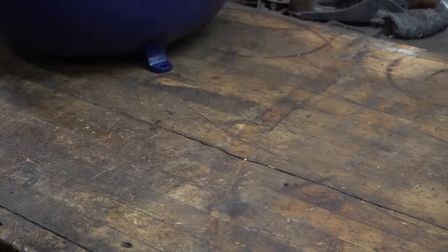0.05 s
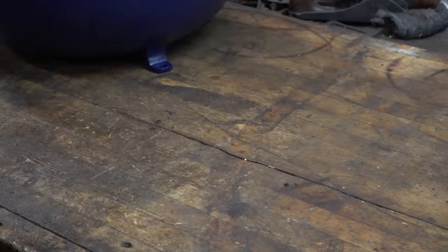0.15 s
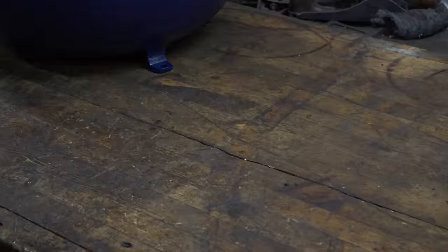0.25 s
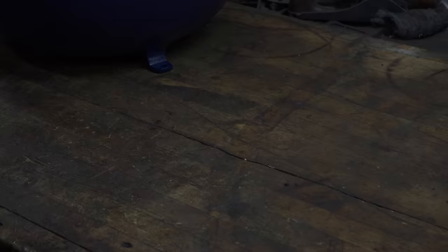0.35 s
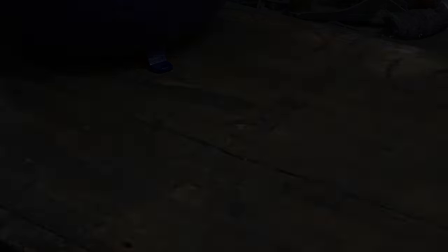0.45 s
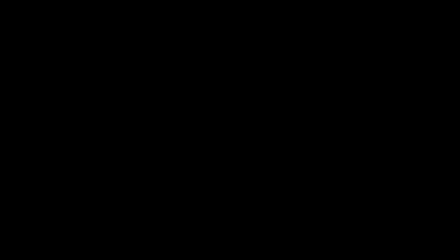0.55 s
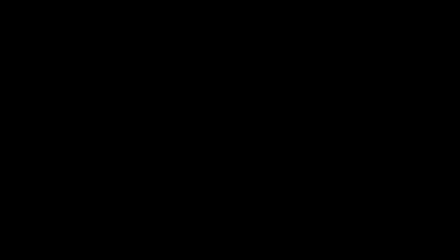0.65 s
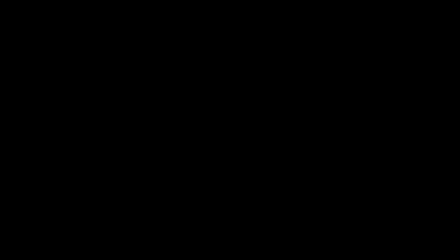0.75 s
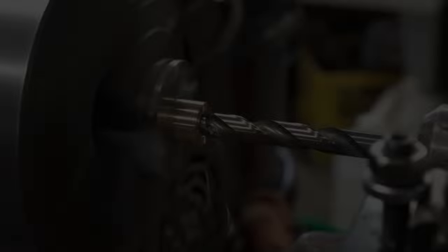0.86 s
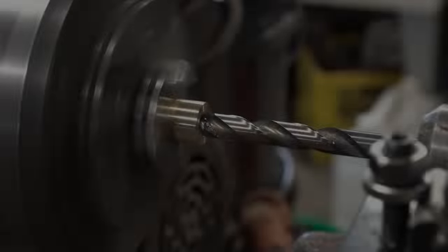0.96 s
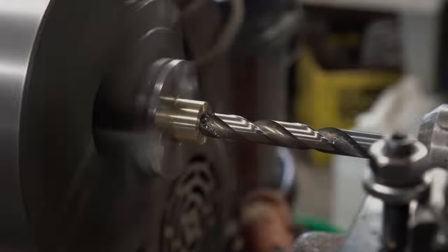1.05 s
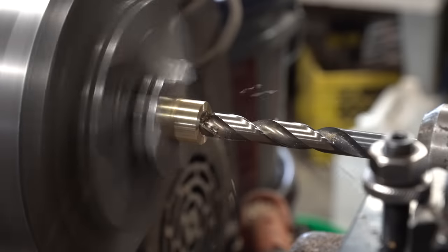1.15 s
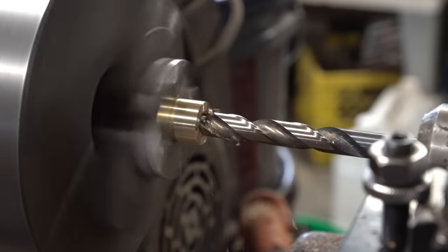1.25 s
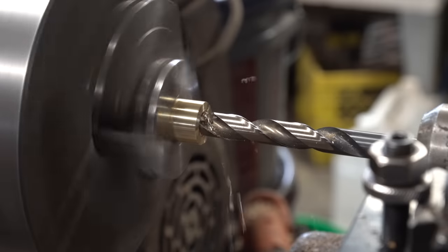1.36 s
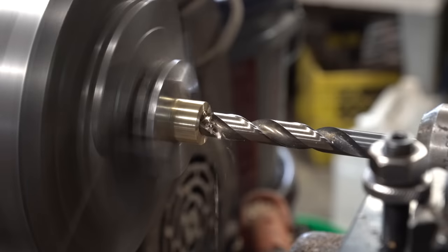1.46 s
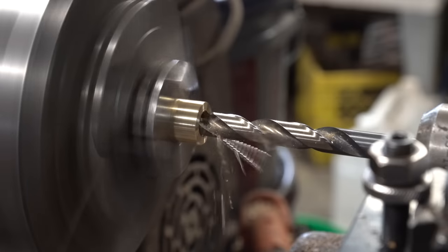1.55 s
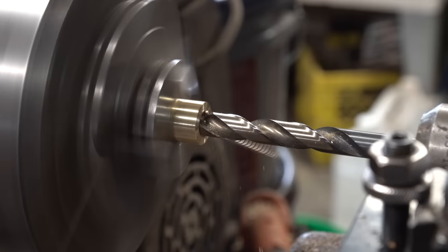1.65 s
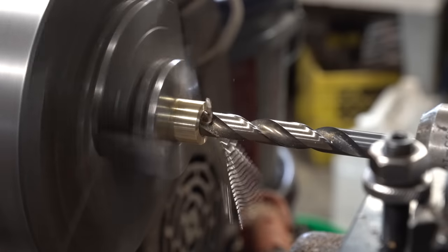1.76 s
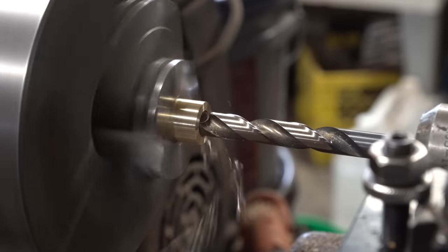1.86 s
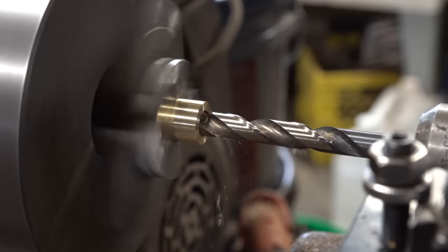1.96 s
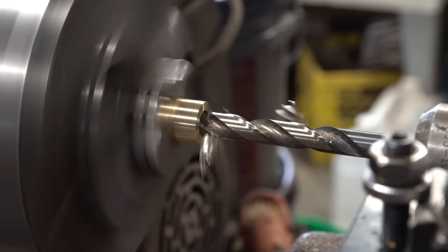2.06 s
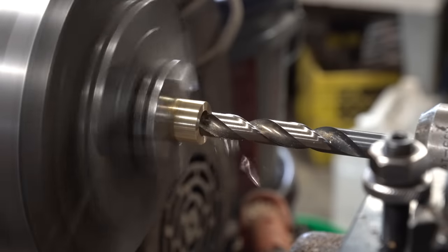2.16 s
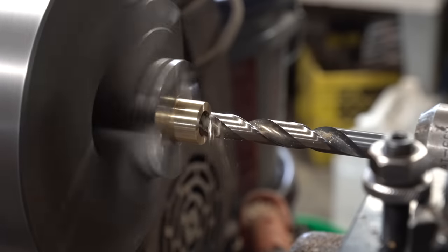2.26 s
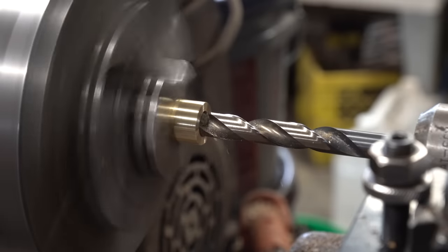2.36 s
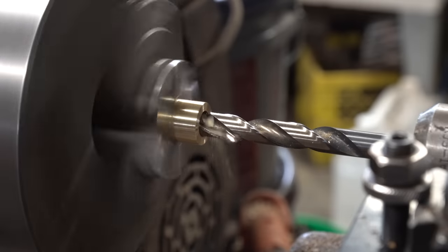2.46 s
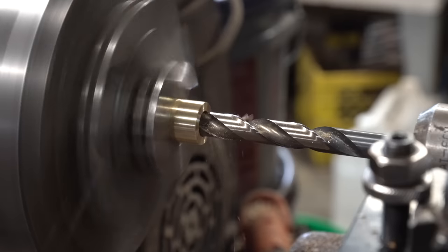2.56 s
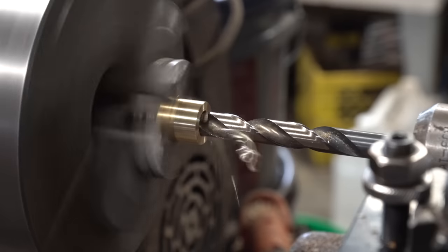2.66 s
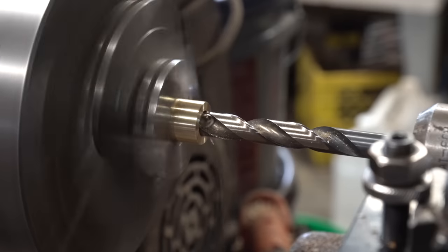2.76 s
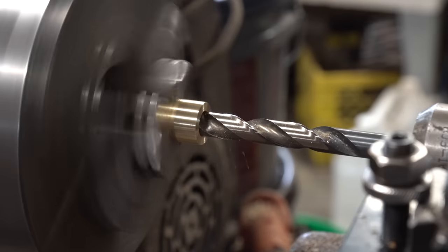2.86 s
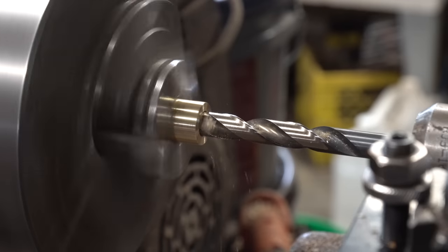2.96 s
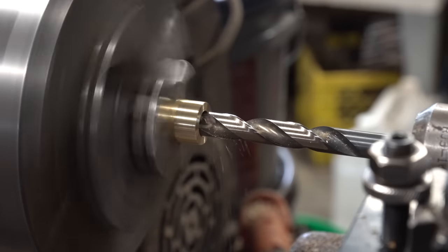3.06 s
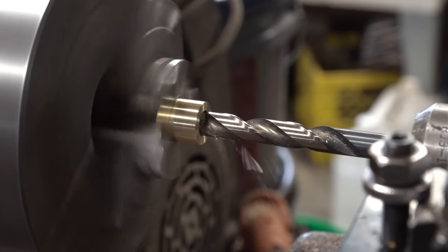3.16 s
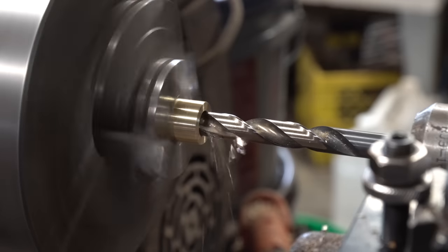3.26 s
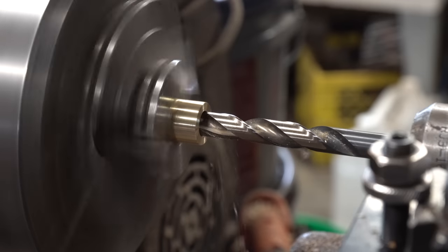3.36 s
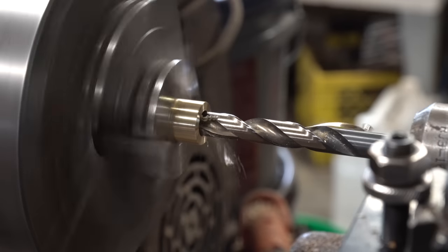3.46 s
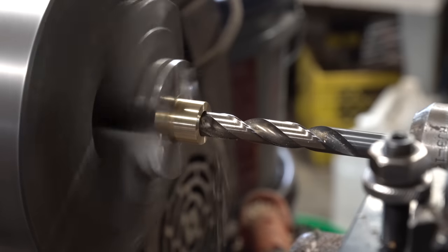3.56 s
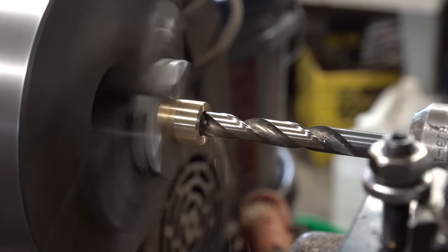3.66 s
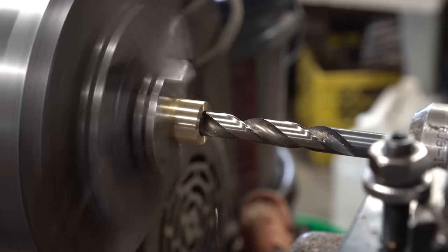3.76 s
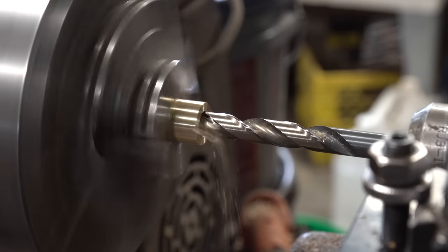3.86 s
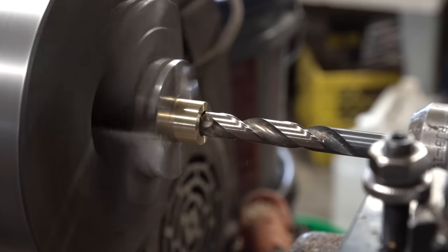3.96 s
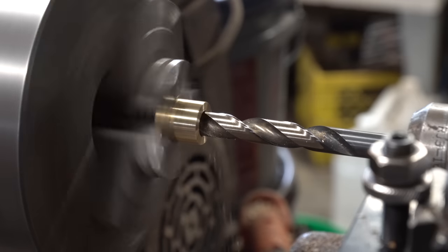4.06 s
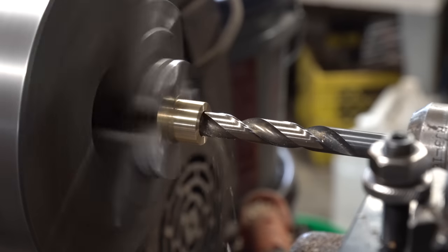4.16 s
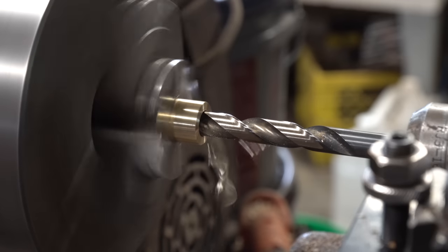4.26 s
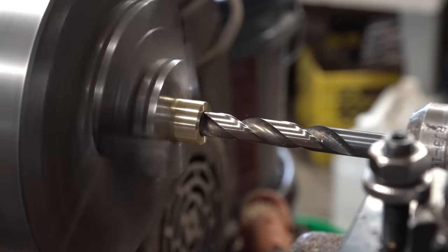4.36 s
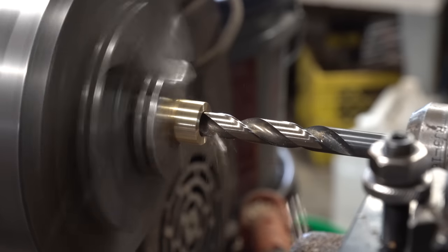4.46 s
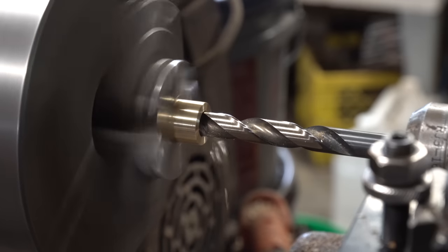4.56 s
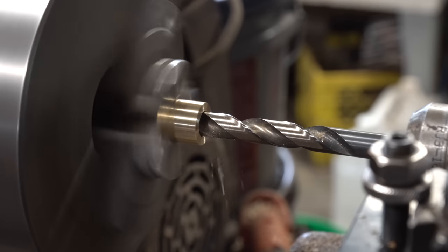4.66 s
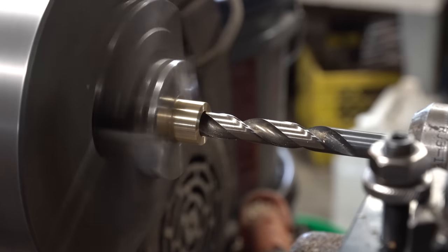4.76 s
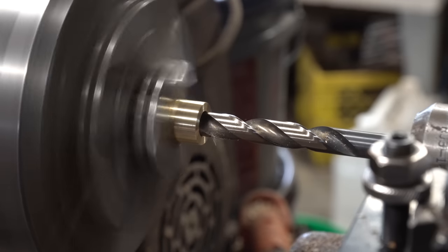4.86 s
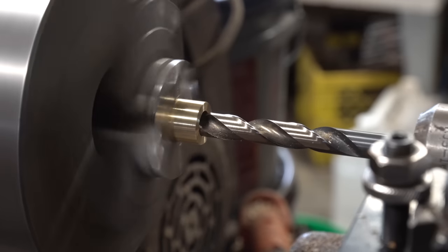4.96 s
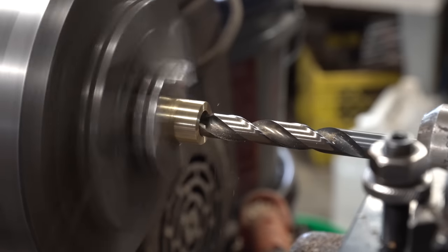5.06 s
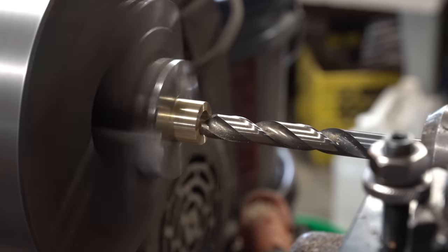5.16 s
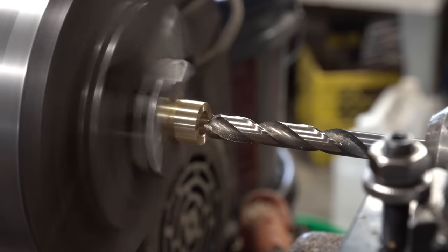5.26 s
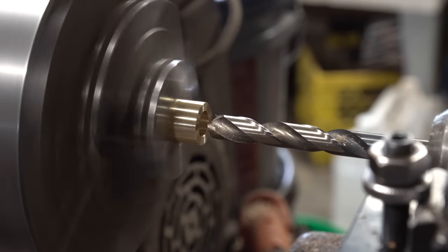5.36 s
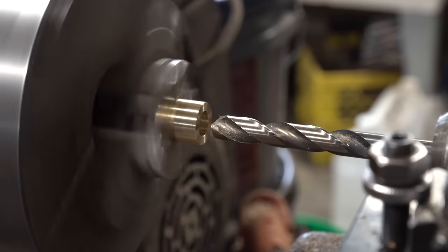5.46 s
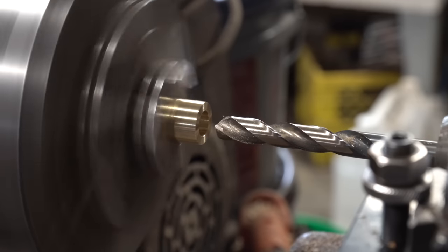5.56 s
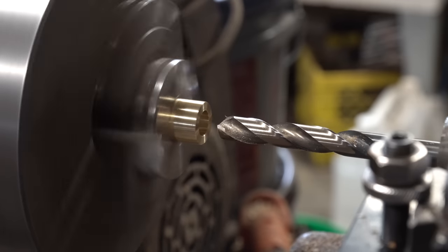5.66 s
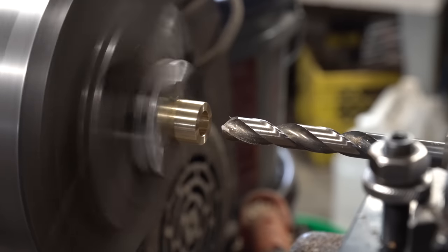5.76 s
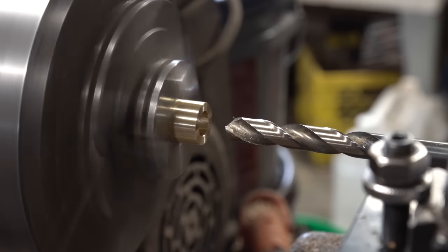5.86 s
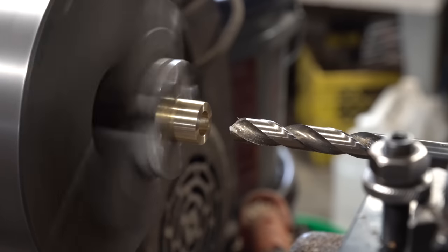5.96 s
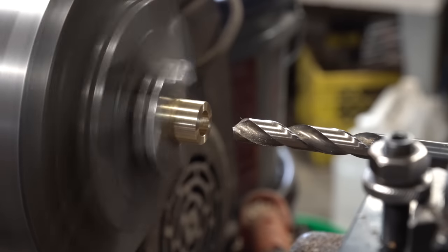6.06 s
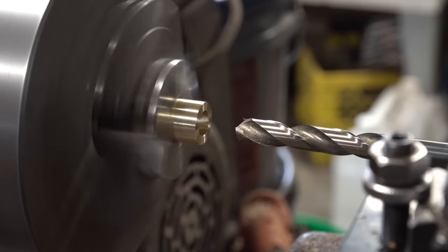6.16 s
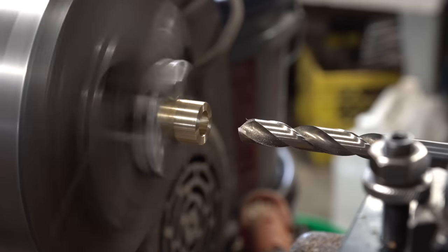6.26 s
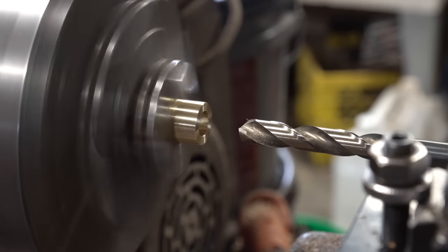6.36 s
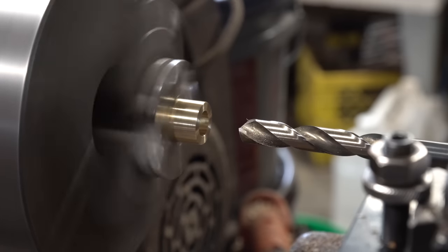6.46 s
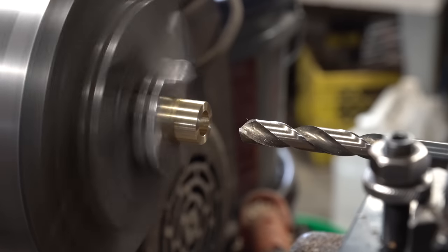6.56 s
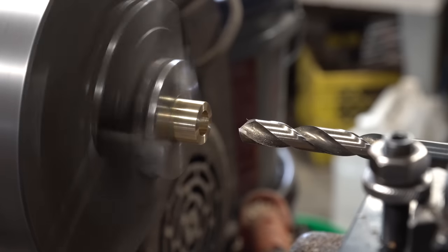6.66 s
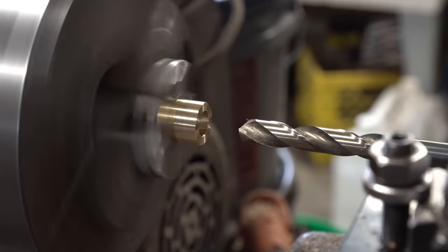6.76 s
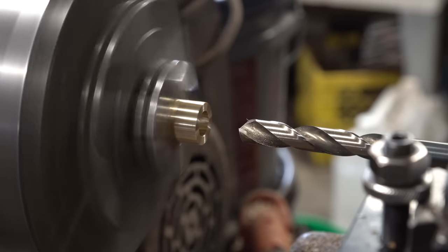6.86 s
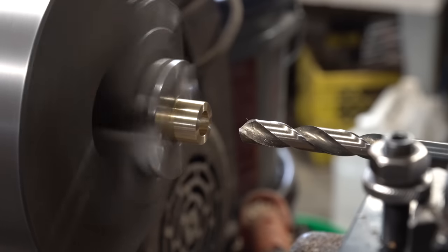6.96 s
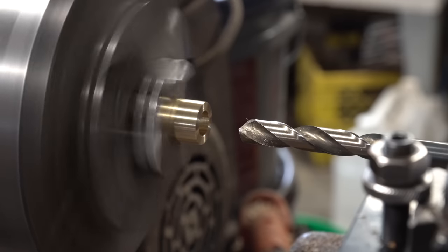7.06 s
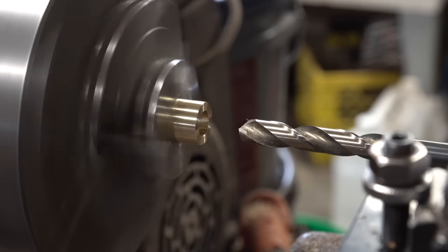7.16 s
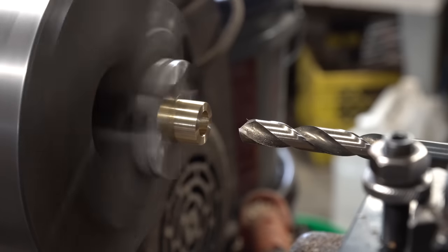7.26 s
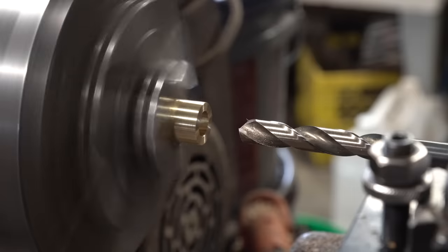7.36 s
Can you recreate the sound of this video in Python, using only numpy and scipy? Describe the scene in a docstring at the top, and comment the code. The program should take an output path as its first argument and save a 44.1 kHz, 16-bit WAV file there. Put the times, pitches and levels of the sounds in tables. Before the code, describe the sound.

Close microphone in a small workshop with very short reflections. After a faint low room tone and slight groan, lathe gears swell in, whining, clattering and knocking unevenly. Brass cutting gives a coarse rasp and airy hiss, then rapid piercing chirps as the machine slows. Its pitch recovers during a ragged squeal; then the running fades lower, with small metallic squeaks near the end.

```python
"""Gears whine and rattle out of a fade-in: a geared lathe spins a brass part while a twist drill is fed in.
Random tooth blows ring the headstock and drone in the bed; the mesh rate sags under the load and recovers.
The cut rasps as filtered grains, then the drill chirps about once a turn and breaks into a squeal that
stutters out, a gliding tone with overtones. The slide groans early on, then scrapes and squeaks when drawn
back. Scattered reflections set it all in a small-sounding workshop, over a faint low room tone."""
import sys
import numpy as np
from scipy import signal
from scipy.fft import irfft
from scipy.io import wavfile
from scipy.ndimage import uniform_filter1d

SR = 44100
rng = np.random.default_rng(int(sys.argv[2]) if len(sys.argv) > 2 else 0)


def to_wav(sig):
    """Store sig (one row per channel, or 1-D mono) as 16-bit WAV at the path in sys.argv[1].

    Samples outside -1..1 are clipped; the rate is SR.
    """
    pcm = np.clip(np.atleast_2d(sig), -1, 1) * 32767
    pcm = np.round(pcm).astype(np.int16)
    wavfile.write(sys.argv[1], SR, pcm.T)  # frames by channels


N = 326527
T = np.arange(N) / SR

# gear mesh rate, sagging as the drill bites: start_s, mesh_hz
MESH_RATE = [(0, 661.3), (.95, 652.5), (1.35, 632), (1.9, 582.2), (2.3, 553.7), (2.55, 531.5), (2.8, 553),
             (3.2, 518), (3.5, 483.2), (3.75, 476), (4.05, 483), (4.45, 520.8), (4.7, 597.6), (4.9, 640.4),
             (5.15, 654.2), (7.4, 654.9)]
TEETH = 30  # tooth meshes per spindle turn
# running gears, before the trims of each layer: start_s, rattle_db, drone_db
GEAR_LEVELS = [(.7, -26, -37), (1.3, -25, -38), (1.8, -26.5, -43.5), (3, -27, -44.5), (3.9, -31, -46),
               (4.45, -31.5, -51.5), (4.82, -27, -40), (5.35, -30.5, -46), (5.7, -33, -48.5),
               (6.3, -35.5, -50.5), (7.4, -35.5, -51.5)]
# band in which tooth blows are strong: freq_hz, relative level_db
BLOW = [(150, -23), (900, -7.5), (1400, -5.5), (1650, -0.5), (2050, -4), (2500, -12), (16000, -24.5)]
# broad colour of the rattling headstock: freq_hz, relative level_db
CASE = [(30, -82), (300, -22), (550, -14.5), (1000, -18), (1400, -13), (2050, -6.5), (2400, -15),
        (3200, -22), (4300, -20), (5500, -28.5), (7300, -34.5), (10000, -47), (13500, -46.5), (16000, -58)]
# resonances of the headstock: centre_hz, width_hz, rise_db
CASE_RINGS = [(720, 98, 5.5), (929, 37, 6.5), (1152, 127, 6.5), (1244, 64, 7.5), (1503, 173, 12.5),
              (1620, 70, 10), (1862, 76, -3.5), (1937, 140, 7.5), (3096, 98, 6), (3575, 120, 8),
              (3857, 125, 7)]
# drill chirps as a lip catches, faster as the squeal breaks up: peak_s, length_s at half height, level_db
CHIRPS = [(2.47, 0.012, -39), (2.797, 0.012, -40), (3.03, 0.01, -43.5), (3.084, 0.0095, -28),
          (3.239, 0.012, -26), (3.298, 0.011, -24.5), (3.315, 0.013, -32.5), (3.354, 0.0099, -21),
          (3.417, 0.012, -39.5), (3.487, 0.014, -29), (3.538, 0.0076, -30), (3.553, 0.014, -23.5),
          (3.619, .01, -26), (3.679, 0.018, -23), (3.746, 0.011, -23), (3.803, 0.019, -24),
          (3.871, 0.019, -25.5), (3.929, 0.02, -24.5), (3.994, 0.016, -25), (4.058, 0.011, -23.5),
          (4.115, 0.019, -28), (4.298, 0.014, -25.5), (4.473, 0.012, -31), (4.531, 0.035, -34.5),
          (4.590, 0.018, -22), (4.635, 0.0077, -23), (4.655, 0.014, -27), (4.966, 0.008, -18),
          (4.984, 0.015, -28.5), (5.001, 0.0065, -29), (5.019, 0.019, -25), (5.037, 0.0071, -23),
          (5.048, 0.0068, -27), (5.062, .011, -25.5), (5.093, 0.01, -33), (5.107, 0.01, -27.5)]
# the held squeal: start and length (s)
SQUEAL_START_S, SQUEAL_S = 4.668, 0.294


def amp(db):
    """Decibels to gain."""
    return 10 ** (np.asarray(db) / 20)


def unit(x):
    """Scales to rms 1."""
    return x / np.sqrt(np.mean(abs(x) ** 2) + 1e-20)


def curves(rows):
    """Each column of a timed table at every sample."""
    s, *columns = np.transpose(rows)
    return [np.interp(T, s, c) for c in columns]


def wander(hz):
    """Smooth chance of rms 1 that moves up to about hz times a second."""
    f = np.fft.rfftfreq(2 ** 19, 1 / SR)[:8192]
    z = rng.standard_normal((8192, 2)) @ [1, 1j]
    # drawn at every 16th sample, then joined by straight lines
    slow = irfft(z * np.exp(-.5 * (f / hz) ** 2), 2 ** 15)
    return unit(np.interp(np.arange(N), np.arange(2 ** 15) * 2 ** 4, slow))


def angle(hz):
    """Running phase of a frequency curve."""
    return 2 * np.pi * np.cumsum(hz) / SR


def colour(x, points, rings=()):
    """Passes x through a causal body with a broad spectrum and resonances; white noise keeps its level."""
    f = abs(np.fft.fftfreq(4096, 1 / SR))
    at, level = np.transpose(points)
    db = np.interp(np.log(f + 1), np.log(at), level)
    for hz, width, rise in rings:
        db = db + rise / (1 + (2 * (f - hz) / width) ** 2)
    # minimum phase: the ring starts at once
    ring = np.fft.ifft(np.exp(signal.hilbert(np.log(amp(db))).conj())).real
    return signal.oaconvolve(x, ring / np.linalg.norm(ring))[:N]


def grains(per_s, spread_db):
    """Random clicks of uneven size and either sign, scaled to rms 1."""
    sizes = amp(spread_db * np.clip(rng.standard_normal(N), -2, 2)) * rng.choice([-1, 1], N)
    return unit(sizes * (rng.random(N) < per_s / SR))


def fuzzy(hz, width):
    """Noise in a steep resonance that follows the curve hz."""
    lowpass = signal.butter(N=3, Wn=width / 2, fs=SR, output="sos")
    slow = signal.sosfilt(lowpass, rng.standard_normal((N, 2)) @ [1, 1j])
    return unit((slow * np.exp(1j * angle(hz))).real)


def stroke(s, length, edge):
    """A gate with soft edges."""
    return (1 + np.tanh((T - s) / edge)) * (1 + np.tanh((s + length - T) / edge)) / 4


def hump(s, length):
    """A smooth rise and fall around s, of the given length at half height."""
    return 2 ** -np.minimum(abs(2 * (T - s) / length), 6) ** 2


def spindle():
    """Turns made by the spindle since the start, the summed mesh rate over the teeth."""
    return np.cumsum(curves(MESH_RATE)[0]) / SR / TEETH


def room_tone():
    """Faint low noise of the room around the machine."""
    return amp(-85.0) * colour(rng.standard_normal(N), [(30, -10), (160, 1), (15000, -34)])


def workshop(x, wet_db=-19, t60_s=0.13):
    """A short tail of scattered reflections from the machine and the walls."""
    t = T[:SR // 2]
    decay = (t > .003) * amp(-60 * t / t60_s)
    taps = rng.choice([-1, 1], len(t)) * (rng.random(len(t)) < 2000 / SR) * decay
    return x + amp(wet_db) * signal.oaconvolve(x, taps / np.linalg.norm(taps))[:N]


def motor():
    """The motor hums at a fixed pitch with slight drift in level and phase."""
    # hum of the motor: freq_hz, level_db
    hum_tones = [(609.5, -63)]
    out = np.zeros(N)
    for hz, db in hum_tones:
        tone = unit(np.cos(2 * np.pi * hz * T + .5 * wander(2.2)))
        out += amp(db + 2 * wander(5.4)) * tone
    return out


def bed(clatter, mesh, drone_db=-2.0, half_db=-11):
    """Bed and guards resonate: they drone under clatter and noise, and boom at half the mesh rate."""
    # broad colour of bed and guards: freq_hz, relative level_db
    bed_colour = [(25, -43), (60, -29.5), (100, -22), (150, -13.5), (215, -10), (300, -6.5), (420, -14.5),
                  (560, -23), (720, -7.5), (1000, -23), (2000, -27.5), (8000, -61)]
    # their resonances: centre_hz, width_hz, rise_db
    bed_rings = [(157.6, 44, 13.8), (342, 118, 19.5), (680, 180, 15.9)]
    level = curves(GEAR_LEVELS)[1]
    push = unit(0.76 * clatter + rng.standard_normal(N))
    drone = amp(level + drone_db) * colour(push, bed_colour, bed_rings)
    # the half-rate tone booms only while it crosses the bed's resonance
    half_tone = np.cos(mesh / 2 + 1.28 * wander(7.6))
    boom = unit(colour(half_tone, bed_colour, bed_rings))
    return drone + amp(level + half_db + 1.2 * wander(16)) * boom


def whine(mesh_hz, mesh):
    """The meshing teeth sing at multiples of the mesh rate."""
    # gear tones: multiple of the mesh rate, level_db relative to the drone column
    gear_tones = [(.8, -20.5), (1, -8), (1.275, -17), (1.5, -14)]
    # standing waves by the machine swell and hide a gliding tone
    crest_hz, spacing_hz, depth_db = 647.5, 85.4, 4.5
    level, out = curves(GEAR_LEVELS)[1], np.zeros(N)
    for k, db in gear_tones:
        standing = depth_db * np.cos(2 * np.pi * (k * mesh_hz - crest_hz) / spacing_hz)
        swell = amp(level + db + standing + 2 * wander(8))
        out += swell * np.cos(k * mesh + 0.3 * wander(24))
    return out


def headstock(clatter, wash_db=-4.5, rattle_db=-7.0, surge_db=0.94):
    """Tooth blows and hissing bearings ring the headstock, surging unevenly with the half turns."""
    rattle = unit(colour(colour(clatter, BLOW), CASE, CASE_RINGS))
    bearings = unit(colour(grains(9000, 1.94), CASE, CASE_RINGS))
    turn = 2 * np.pi * spindle()
    surge = unit(amp(surge_db * (np.cos(turn) + np.cos(2 * turn) + wander(30))))
    level = amp(curves(GEAR_LEVELS)[0]) * surge
    return level * (amp(rattle_db) * rattle + amp(wash_db) * bearings)


def gears(throb_db=1.0, flutter_db=2.5, tooth_db=2):
    """Teeth clatter in their backlash, hardest once a shaft turn, and drive headstock, bed and whine."""
    mesh_hz = curves(MESH_RATE)[0]
    mesh = angle(mesh_hz * (1 + .0015 * wander(10)))
    shaft = mesh / TEETH + .35 * wander(8)
    force_db = throb_db * np.cos(shaft) + flutter_db * wander(90) + tooth_db * np.cos(mesh)
    clatter = unit(amp(force_db)) * grains(1200, 3.9)
    return headstock(clatter) + bed(clatter, mesh) + whine(mesh_hz, mesh)


def knocks(trim_db=-0.5, attack_s=0.0034, length_s=0.0067):
    """Twice a turn a tooth crosses its gap and buzzes briefly against its mate; the headstock rings."""
    # hardest knocks, before the trim: centre_s, level_db
    hard_knocks = [(1.043, -25), (1.230, -22), (1.515, -20.5), (1.821, -25), (3.418, -27), (3.602, -30),
                   (3.665, -28.5), (3.73, -25), (3.846, -26), (3.909, -27), (3.98, -27), (4.283, -30.5),
                   (4.323, -27), (4.446, -30), (4.708, -22), (4.803, -20.5), (4.858, -21.5), (4.908, -21),
                   (5.047, -22.5), (5.18, -22), (5.231, -23.5), (5.31, -24.5), (5.369, -22), (5.404, -22.5),
                   (5.485, -26.5), (5.505, -25.5), (5.627, -30), (5.689, -27.5), (5.735, -26), (5.764, -30),
                   (5.861, -25.5), (5.91, -26.5), (6.278, -30.5), (6.31, -32.5), (6.364, -29.5),
                   (6.407, -29.5), (6.540, -35), (7.0, -31), (7.017, -26.5), (7.045, -33.5)]
    # ordinary knocks: level over the rattle column, its spread, the drop of every second one
    over_db, spread_db, second_db = -4, 1.5, -1.5
    first_turn, scatter_s = 1, .004
    late, strength = np.clip(rng.standard_normal((320, 2)), -2, 2).T
    half_turn = np.arange(len(late))
    times = np.interp(half_turn / 2 + first_turn, spindle(), T, right=np.inf) + scatter_s * late
    levels = np.interp(times, T, curves(GEAR_LEVELS)[0]) + over_db
    levels += spread_db * strength + second_db * (half_turn % 2)
    # a hard knock takes the place of the ordinary one
    ordinary = [(s, db) for s, db in zip(times, levels)
                if all(abs(s - hard) > .012 for hard, _ in hard_knocks)]
    body = colour(colour(colour(np.ones(1), BLOW), BLOW), CASE, CASE_RINGS)[:4096]
    out, t = np.zeros(N), T[:1400] - T[700]
    for s, db in hard_knocks + ordinary:
        envelope = np.exp(-(t / np.where(t < 0, attack_s, length_s)) ** 2)
        buzz = rng.standard_normal(len(t)) * envelope
        if t[-1] < s < T[-1]:
            ring = signal.fftconvolve(buzz, body)
            # scaled so that the loudest 5 ms has rms 1
            ring = ring / np.sqrt(uniform_filter1d(ring ** 2, size=220).max())
            part = out[round((s + t[0]) * SR):][:len(ring)]
            part += amp(db + trim_db) * ring[:len(part)]
    return out


def slide(jitter=0.0044, rough=0.22):
    """Steel drags on steel as coloured grains and now and then sticks and squeaks roughly."""
    # strokes of the slide: start_s, length_s, level_db
    scrapes = [(6.643, 0.053, -36), (6.926, 0.036, -36.5), (7.18, 0.04, -47.5), (7.298, 0.04, -46)]
    # colour of sliding steel: freq_hz, relative level_db
    slide_colour = [(30, -35), (200, 4), (850, 4), (1500, -12), (2600, 13.5), (3400, 10.5), (4450, 14),
                    (5500, 2.5), (8000, 0.5), (16000, -18)]
    # resonances of the slide: centre_hz, width_hz, rise_db
    slide_rings = [(846, 102, 12), (2625, 246, 9), (4527, 174, 7.5)]
    # squeaks and groans: start_s, length_s, pitch_hz, level_db
    squeaks = [(0.335, 0.094, 824, -31.5), (0.425, 0.099, 846, -39), (6.915, 0.0084, 2660, -27),
               (6.945, 0.028, 4450, -32), (6.975, 0.023, 4450, -39), (7.013, 0.0096, 4430, -24.5),
               (7.027, 0.017, 4430, -33), (7.189, 0.029, 4380, -46), (7.274, 0.0039, 4465, -36),
               (7.275, 0.0047, 8400, -45), (7.186, 0.03, 13850, -64), (7.3, 0.013, 4870, -49)]
    pressure = sum(amp(db) * stroke(s, length, 0.0095) for s, length, db in scrapes)
    rub = pressure * amp(2 * wander(89.6)) * grains(2000, 3.3)
    out = colour(rub, slide_colour, slide_rings)
    for s, length, hz, db in squeaks:
        phase = angle(hz * (1 + jitter * wander(106.9))) + rough * wander(hz / 10)
        grip = amp(db + 2.5 * np.minimum(wander(140), 1)) * stroke(s, length, 0.0025)
        out += grip * np.sqrt(2) * np.cos(phase)
    return out


def chips(count=24, per_s=110, low_hz=3530, high_hz=4560, level_db=-58.5):
    """Larger chips snap off and tick against the steel, each with a short ring at one of count pitches."""
    start_s, length_s = 2.97, 2.82
    t, out = T[:1500], np.zeros(N)
    for hz in np.geomspace(low_hz, high_hz, count):
        decay = amp(-60 * t / .012) * (1 - np.exp(-t / .0005))
        ring = np.sin(2 * np.pi * hz * t) * decay
        out += signal.oaconvolve(grains(per_s / count, 4.5), ring)[:N]
    return amp(level_db) * unit(out) * stroke(start_s, length_s, 0.033)


def crunch(lead_s=0.035, length_s=0.022, first_db=-38.5, fall_db_per_s=1):
    """Chips packed in the hole are crushed just before the lip catches, for the chirps within a span."""
    # colour of the crunch: freq_hz, relative level_db
    crunch_colour = [(100, -68), (1700, -20), (2370, 8), (2750, -5), (3500, -28), (8000, -53)]
    from_s, until_s = 3.27, 3.92
    squeeze = sum(hump(s - lead_s, length_s) for s, _, _ in CHIRPS if from_s < s < until_s)
    level = amp(first_db - fall_db_per_s * (T - from_s))
    return colour(np.minimum(squeeze, 1) * level * grains(700, 3), crunch_colour)


def cut(pulse_db=0.0, swarf_flicker_db=2.5, mouth_width=1900, flute_width=1500, rim_hz=7700):
    """Brass breaks into tiny chips at the lips and hisses over the rim, up the flutes and out of the mouth."""
    # how hard the lips cut: start_s, rasp_db
    cut_levels = [(.4, -32.5), (.9, -33.5), (1.9, -32.5), (2.5, -34.5), (3.0, -34.5), (3.35, -41),
                  (3.6, -80), (4.1, -69), (4.5, -50), (5, -84)]
    # colour of the rasp: freq_hz, relative level_db
    rasp_colour = [(50, -42.5), (160, -8), (220, -13), (300, 0), (1000, 0.5), (1220, 13), (1500, 8.5),
                   (1780, 0.5), (2350, 5), (3000, 0.5), (4400, -3), (6200, -11), (7500, -45), (9700, -60),
                   (16000, -53)]
    # swarf bands, shifting as the hole deepens: start_s, mouth_hz, mouth_db, flute_hz, flute_db, rim_db
    swarf_bands = [(.5, 13500, -61, 10640, -59.5, -52.5), (1.05, 13800, -58, 10600, -61, -52),
                   (1.8, 14600, -54.5, 11500, -60.5, -56), (2.4, 14800, -63, 11800, -63, -74),
                   (2.95, 14600, -71, 11650, -56, -88), (3.45, 14600, -79, 10550, -62.5, -87),
                   (4.5, 14600, -76, 10000, -70, -83), (5.2, 14500, -100, 10000, -87, -75)]
    feed = amp(1.44 * wander(56))
    rasp = colour(grains(5000, 2.4) * feed * amp(curves(cut_levels)[0]), rasp_colour)
    mouth_hz, mouth_db, flute_hz, flute_db, rim_db = curves(swarf_bands)
    bands = [
        (mouth_hz + 250 * wander(15), mouth_width, mouth_db),
        (flute_hz + 260 * wander(24.1), flute_width, flute_db),
        (np.full(N, rim_hz), 2400, rim_db),
    ]
    swarf = np.zeros(N)
    for hz, width, db in bands:
        flicker = unit(amp(swarf_flicker_db * wander(50)))
        swarf += fuzzy(hz, width) * amp(db) * flicker
    return rasp + feed * amp(pulse_db * np.cos(2 * np.pi * spindle())) * swarf


def chirps():
    """Swing of the drill each time a lip catches abruptly and lets go."""
    swing = np.zeros(N)
    for s, length, db in CHIRPS:
        near = slice(round((s - .05) * SR), round((s + .05) * SR))
        steepness = np.where(T[near] < s, 3, 2)
        swing[near] += amp(db) * 2 ** -(abs(2 * (T[near] - s) / length) ** steepness)
    return swing


def scratch(swing, slip, locked, grit_db=-19, held_grit_db=-16):
    """The lip scratches as it swings, less once the squeal has locked."""
    # colour of the scratch under the drill's tone: freq_hz, relative level_db
    scratch_colour = [(5300, -36), (6200, 1), (6950, 9), (7400, -11), (8200, -22), (9300, -2.5),
                      (11000, -19.5), (13000, 4), (14000, -26)]
    bite = amp(grit_db + held_grit_db * locked) * swing * np.sqrt(slip)
    bite = bite * unit(amp(1.1 * wander(200)))
    return colour(bite * grains(3500, 2.8), scratch_colour)


def chatter(hz, twist, locked, sum_db=-16, difference_db=-12, third_db=-15, jitter_hz=130, trim_db=-1.0):
    """A second, ragged mode of the drill grips and lets go in shreds; the shared contact mixes it with twist."""
    # bursts of the second mode, before the trim: start_s, length_s, level_db, start_hz, glide_hz_per_s
    chatter_bursts = [(3.274, 0.011, -28.5, 2400, 0), (3.325, 0.017, -37, 2920, 3997),
                      (4.649, 0.066, -46, 4180, 4000), (4.749, 0.0073, -24, 4300, 9005),
                      (4.765, 0.083, -40.5, 4450, -400), (4.844, 0.0071, -25, 4150, 5000),
                      (4.857, 0.06, -34, 4320, -3500), (4.921, 0.011, -26, 4090, -2),
                      (4.946, 0.0072, -29, 3950, -8000), (4.969, 0.093, -44, 3935, -3000)]
    shreds = amp(trim_db + 4.5 * np.clip(wander(160), -3, 1.1))
    # higher modes, shaken by the contact
    upper = amp(third_db) * fuzzy(hz * 1.342, 210)
    upper += amp(-32) * fuzzy(hz * 2.344, 400) + amp(-33) * fuzzy(hz * 2.2, 1800)
    jitter, out = jitter_hz * wander(303), np.zeros(N)
    for s, length, db, start_hz, glide in chatter_bursts:
        burst = amp(db) * stroke(s, length, 0.002) * shreds
        bend = angle(start_hz + glide * np.clip(T - s, 0, length) + jitter)
        # sum and difference tones of the two modes
        mixed = amp(sum_db) * np.cos(twist + bend) + amp(difference_db) * np.cos(twist - bend)
        out += np.sqrt(2) * burst * (np.cos(bend) + locked * (mixed + upper))
    return out


def drill(jitter_hz=11, flutter_db=2.87, octave_db=-12, chirp_octave_db=-7.0, slip_s=0.00634, slip_sag_hz=90):
    """The drill twists in stick-slip: chirps as a lip bites, then a held squeal that wakes further modes."""
    # the drill's pitch: start_s, pitch_hz
    drill_pitch = [(3.3, 6470), (3.7, 6520), (4.1, 6484), (4.62, 6497), (4.87, 6466), (4.93, 6450),
                   (5.1, 6410)]
    # moments at which the held squeal loses its grip and stutters: centre_s, depth 0-1
    grip_losses = [(4.699, 0.38), (4.75, 0.65), (4.888, 0.3), (4.9, 0.9), (4.939, 0.97)]
    # loudest at the crest, sagging on both sides in dB per s squared
    squeal_db, crest_s, sag_db, edge_s = -22.5, 4.83, 137, 0.0057
    # faint ringing while it bores, and how long the stick-slip stays locked once the squeal has begun
    ring_start_s, ring_s, ring_db, locked_s = 1.31, 3.12, -55, 0.44
    lost = np.minimum(sum(depth * hump(s, slip_s) for s, depth in grip_losses), 1)
    held = amp(squeal_db - sag_db * (T - crest_s) ** 2)
    held = held * stroke(SQUEAL_START_S, SQUEAL_S, edge_s) * (1 - lost)
    ringing = amp(ring_db + 8.3 * np.minimum(wander(110), 1)) * stroke(ring_start_s, ring_s, 0.14)
    swing = (held + chirps()) * amp(flutter_db * np.minimum(wander(55), 1)) + ringing
    # only a wide swing slips fully and makes overtones, most of all once it is held
    slip = np.tanh(swing / amp(-30))
    locked = stroke(SQUEAL_START_S, locked_s, .02)
    unsteady_hz = jitter_hz + 35 * (1 - slip) + 15 * (1 - locked)
    hz = curves(drill_pitch)[0] + unsteady_hz * wander(76.8) - slip_sag_hz * lost
    twist = angle(hz)
    octave_level_db = octave_db + chirp_octave_db * (1 - locked) + 5.0 * np.clip(wander(43), -2, 1.3)
    octave = amp(octave_level_db) * np.sqrt(slip)
    octave_phase = 2 * twist + (0.26 + .15 * (1 - locked)) * wander(234)
    squeal = np.sqrt(2) * swing * (np.cos(twist) + octave * np.cos(octave_phase))
    return squeal + scratch(swing, slip, locked) + chatter(hz, twist, locked)


def scene():
    """The lathe fades in, in its workshop, over the room tone."""
    fade_start_s, fade_s, steepness = 0.19, 0.99, 1.655
    fade = np.sin(np.pi / 2 * np.clip((T - fade_start_s) / fade_s, 0, 1)) ** steepness
    machine = motor() + gears() + knocks() + slide()
    drilling = chips() + crunch() + cut() + drill()
    return (workshop((machine + drilling) * fade) + room_tone())[None]


def record(dry, edge_hz=15750):
    """The recorder's band limit: a steep low-pass after the microphone."""
    lowpass = signal.firwin(511, edge_hz, window=("kaiser", 9), fs=SR)
    return signal.oaconvolve(dry, lowpass[None], "same")


dry = scene()
out = record(dry)
to_wav(out)
```